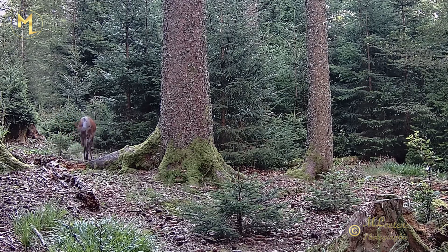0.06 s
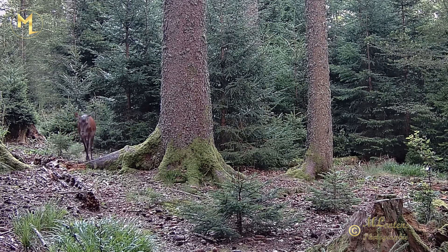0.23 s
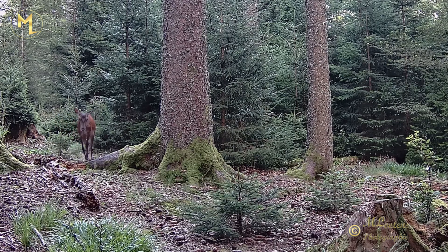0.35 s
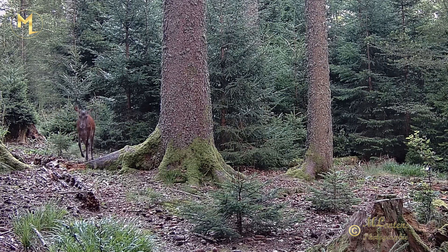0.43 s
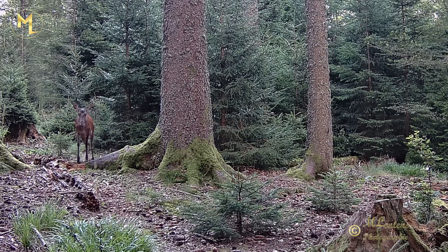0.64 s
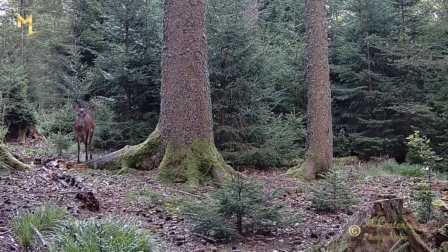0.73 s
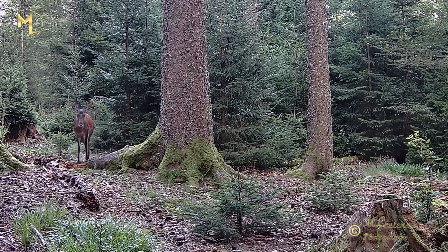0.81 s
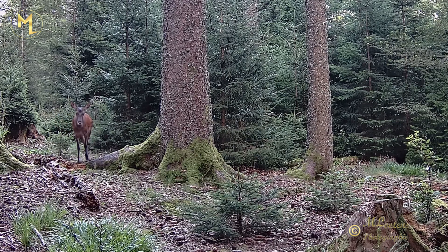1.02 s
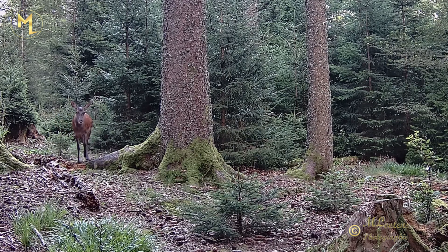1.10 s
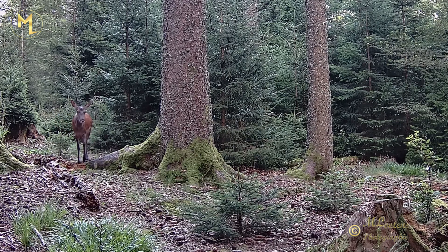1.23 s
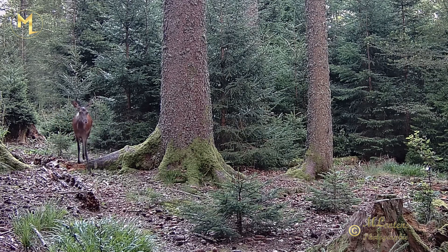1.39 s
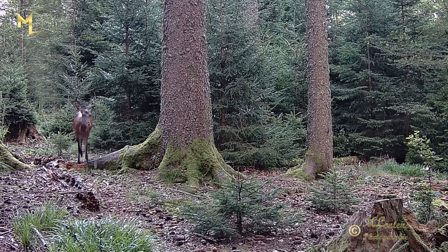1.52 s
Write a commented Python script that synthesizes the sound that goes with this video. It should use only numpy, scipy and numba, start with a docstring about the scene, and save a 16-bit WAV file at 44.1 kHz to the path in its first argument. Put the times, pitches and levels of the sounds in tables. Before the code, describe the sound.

A deer gives one short, harsh grunt amid soft hoof thuds and snapping twigs.

```python
"""A low forest rumble and hiss, soft hoof thuds and snapping twigs, then a deer's short, harsh grunt.
Its vocal folds snap shut ever more slowly, ringing the throat over a deep fundamental, and the call
ends in a puff of air; the trees return a faint tail. The rumble and hiss sink for a moment
after the call, then come back under a few more steps and snaps."""
import sys
import numpy as np
from scipy import signal
from scipy.fft import rfft, irfft
from scipy.io import wavfile
from scipy.ndimage import uniform_filter1d
from numba import njit

SR = 44100
rng = np.random.default_rng(int(sys.argv[2]) if len(sys.argv) > 2 else 0)


def master_out(mix):
    """Clip the mix to full scale and print it as 16-bit PCM to the path in sys.argv[1]."""
    frames = np.transpose(np.atleast_2d(mix))
    ceiling = np.clip(frames, -1, 1)
    pcm = np.round(ceiling * 32767).astype(np.int16)
    wavfile.write(sys.argv[1], SR, pcm)


N = 68355
GLIDE_S = (.45, .52)  # the throat lengthens over this time


def undb(db):
    """Decibels to gain."""
    return 10 ** (np.asarray(db) / 20)


def curve(rows, t, column=1):
    """Join a table's rows by straight lines."""
    rows = np.array(rows)
    return np.interp(t, rows[:, 0], rows[:, column])


def unit(x):
    """Scale to rms 1."""
    return x / np.std(x)


def colour(x, points):
    """Minimum-phase EQ through (freq_hz, gain_db) points."""
    size = 2 * N
    hz, db = np.array(points).T
    bins_hz = np.maximum(np.arange(N + 1) * SR / size, 1)
    cepstrum = irfft(np.log(undb(np.interp(np.log(bins_hz), np.log(hz), db))))
    cepstrum[1:N] *= 2
    cepstrum[N + 1:] = 0
    return irfft(rfft(x, size) * np.exp(rfft(cepstrum)))[:N]


def noise(points):
    """Noise coloured by an EQ curve, rms 1."""
    return unit(colour(rng.standard_normal(N), points))


def ring(x, hz, width_hz):
    """One resonance, gain 1 at its centre."""
    return signal.lfilter(*signal.iirpeak(hz, hz / width_hz, fs=SR), x)


@njit
def resonate(x, hz, width_hz):
    """A resonance whose centre and damping move."""
    out, z = np.empty(len(x)), 0j
    for i in range(len(x)):
        z = z * np.exp((2j * hz[i] - width_hz[i]) * np.pi / SR) + x[i] + 1e-18
        out[i] = z.real * 2 * np.pi / SR
    return out


def lowpass(x, hz):
    """Low-pass without delay."""
    return signal.sosfiltfilt(signal.butter(4, hz, fs=SR, output="sos"), x, padtype="even")


def drift(rate_hz):
    """Random wander, spread 1."""
    hold = int(SR / rate_hz)
    steps = np.repeat(rng.standard_normal(N // hold + 1), hold)
    return unit(uniform_filter1d(steps, hold)[:N])


def gate(t, start_s, end_s, fade_samples):
    """On between two times, with soft edges."""
    return uniform_filter1d(1. * ((t > start_s) & (t < end_s)), fade_samples)


def clicks(times, sizes):
    """Single sharp pushes at the given times."""
    out = np.zeros(N)
    for at_s, size in zip(times, sizes):
        i = int(at_s * SR) + np.arange(-8, 9)
        out[i] += size * np.sinc(i - at_s * SR) * np.hanning(len(i))
    return out


def knock(t, peak_s, level_db, pitch_hz, width_s):
    """A dull knock: a low tone under a brief bell-shaped envelope."""
    age = t - peak_s
    return undb(level_db) * np.exp(-(age / width_s) ** 2) * np.cos(2 * np.pi * pitch_hz * age)


def background(t):
    """Fluttering rumble, smooth hiss and a faint far drone; all sink after the call."""
    # tone of the forest air: freq_hz, gain_db
    forest_eq = [(15, -41.5), (25, 1), (43, -5), (87, 0.5), (133, -9), (186, -7.5), (273, -14.5), (364, -9),
                 (474, -15.5), (522, -14.5), (662, -19), (1040, -18), (1940, -23), (4710, -26.5),
                 (7600, -33), (9880, -91.5), (16700, -120)]
    # level ride: time_s, bass_db, treble_db
    ride = [(0, 4, 2), (.3, 6.5, 4.5), (.53, 11, 6), (.60, -1, -6.5), (.70, -7.5, -9), (.925, -12, -9.5),
            (.95, -2, -2.5), (1.1, 1.5, -0.5), (1.55, -1.5, -0.5)]
    bed = undb(-42) * noise(forest_eq)
    rumble = lowpass(bed, 200)
    hiss = bed - rumble
    drone_hz, width_hz = 364, 64
    drone = undb(-57.5) * unit(ring(ring(rng.standard_normal(N), drone_hz, width_hz), drone_hz, width_hz))
    flutter_db = drift(rate_hz=18)
    return rumble * undb(curve(ride, t) + flutter_db) + (hiss + drone) * undb(curve(ride, t, column=2))


def woods(x, t):
    """The direct sound plus faint scatter from trunks and branches."""
    t60_s, predelay_s, wet_db = .36, .02, -22
    tail = rng.standard_normal(N) * np.exp(-np.log(1000) * t / t60_s) * (t > predelay_s)
    return x + undb(wet_db) * signal.fftconvolve(x, tail / np.linalg.norm(tail))[:N]


def hooves(t):
    """Hooves thud dully into soft ground."""
    # steps on the leaf litter: peak_s, level_db, pitch_hz, width_s
    thuds = [(0.078, -33, 45.3, 0.0092), (.178, -27, 57.6, .018), (1.123, -34, 86.5, 0.014),
             (1.305, -36, 200, 0.0058), (1.475, -37, 85.4, 0.022)]
    return sum(knock(t, *thud) for thud in thuds)


def twigs(t):
    """Each twig cracks, rings briefly at two pitches and splinters."""
    # breaking twigs: start_s, level_db, low_hz, low_db, high_hz, high_db, splinter_db, splinter_decay_s
    snaps = [(.2182, -24.5, 2436, 6.5, 5320, 6.5, -22.5, 0.012),
             (0.227, -33.5, 2500, 18, 3410, 10, -10.5, 0.0089),
             (0.3683, -39, 5400, -7.5, 6550, 12, -8, 0.0094), (1.029, -47.5, 1800, 9, 5500, 9, -11, 0.0054),
             (1.1688, -33.5, 4070, 12, 5560, 16, -38, 0.0022),
             (1.2212, -44.5, 1540, 18, 4270, -2, -15, 0.0046)]
    # tone of dry wood cracking: freq_hz, gain_db
    wood_eq = [(300, -27), (1000, -20.5), (1500, -2.5), (2000, -11.5), (2500, -5), (3600, -1), (4600, -4),
               (5400, -9.5), (6000, -16.5), (7500, -27.5)]
    ring_q, span_s = 9, .01  # a snap's level is its rms as if packed into this span
    out = np.zeros(N)
    for start_s, level_db, low_hz, low_db, high_hz, high_db, splinter_db, splinter_decay_s in snaps:
        age = np.maximum(t - start_s, 0)
        crack_decay_s = min(.0013, splinter_decay_s / 4.4)
        crack = undb(-7) * np.exp(-age / crack_decay_s)
        splinter = undb(splinter_db + 2 * drift(rate_hz=980)) * np.exp(-age / splinter_decay_s)
        tearing = rng.standard_normal(N) * (crack + splinter) * (t >= start_s)
        snap = colour(clicks([start_s], [1]) + tearing, wood_eq)
        snap = (snap + undb(low_db) * ring(snap, low_hz, low_hz / ring_q)
                + undb(high_db) * ring(snap, high_hz, high_hz / ring_q))
        out += undb(level_db) * snap / np.sqrt(np.sum(snap ** 2) / (span_s * SR))
    return out


def vocal_folds(t):
    """The folds snap shut ever more slowly; gives the closures, phase in cycles and effort envelope."""
    # falling pitch of the grunt: time_s, pitch_hz
    pitch = [(.313, 133), (.36, 129), (.395, 125.3), (.427, 118.8), (.445, 111.5), (.465, 108), (.50, 96.8),
             (.515, 91), (.56, 91)]
    # force of the closures: time_s, level_db
    force = [(.313, -10.5), (.335, -20), (.352, -8), (.385, -5), (.432, -1), (.48, -1), (.505, -3.5),
             (.52, 0.5)]
    start_s, end_s = .3133, .524  # the folds touch only between these times
    uneven_db, uneven_lag_s, shimmer_db, jitter_s = 2, .0008, .4, .00005
    phase = np.cumsum(curve(pitch, t)) / SR
    phase -= np.interp(start_s, t, phase)
    cycle = np.arange(int(np.interp(end_s, t, phase)) + 1)
    shut_s = np.interp(cycle, phase, t)
    shimmer, jitter = rng.standard_normal((len(cycle), 2)).T
    uneven = (shut_s < .40) * (cycle > 1) * (-1) ** cycle  # early on, every second one is weak and late
    sizes = undb(curve(force, shut_s) - uneven_db * uneven + shimmer_db * shimmer)
    closures = clicks(shut_s + uneven_lag_s * uneven / 2 + jitter_s * jitter, sizes)
    effort = undb(curve(force, t)) * gate(t, start_s, end_s, fade_samples=200)
    return closures, phase, effort


def puff(t):
    """Air let go at the end of the call."""
    # tone of the breath: freq_hz, gain_db
    puff_eq = [(200, -14.5), (700, -6), (1400, -2), (2500, 3), (3000, -9), (3500, 1), (4800, -13),
               (5600, -34), (7500, -43)]
    peak_s, width_s = .529, .011
    return undb(-32) * np.exp(-((t - peak_s) / width_s) ** 2) * noise(puff_eq)


def wheeze(effort, t):
    """Air hisses through the open mouth."""
    # tone of that hiss: freq_hz, gain_db
    wheeze_eq = [(2000, -33), (3100, -12), (3500, -3), (3950, -5.5), (4400, -0.5), (5050, -2.5),
                 (5350, -24), (7500, -44.5)]
    return undb(-38) * effort * (t > .377) * noise(wheeze_eq)


def rasp(effort, phase, t):
    """Steady air in the voice and, late in the call, a burst of it just ahead of each closure."""
    lead_cycles, width_cycles, burst_db, steady_db = .17, .09, -14.5, -40
    offset = (phase + lead_cycles + .5) % 1 - .5
    bursts = np.exp(-(offset / width_cycles) ** 2) * np.interp(t, GLIDE_S, [0, 1])
    return effort * (undb(burst_db) * bursts + undb(steady_db)) * rng.standard_normal(N)


def throat(source, phase, t):
    """Fixed throat colour, plus sharp resonances that sink as the call ends; open folds damp them."""
    # formants of throat and mouth: freq_hz, gain_db
    throat_eq = [(150, -34), (300, -31.5), (430, -16.5), (680, -26), (1000, -14.5), (1330, -4.5), (1500, 1),
                 (1830, -3), (2100, -3.5), (2420, -1), (2700, -8), (3000, -27), (3500, -12.5), (3900, -16),
                 (4250, -12.5), (5050, -19.5), (5350, -49), (7500, -60)]
    # resonances that ring while the folds are shut: early_hz, late_hz, width_hz, early_db, late_db
    rings = [(2130, 2090, 93, 8.5, 0.5), (1300, 490, 100, -6, 14), (490, 480, 45, 9, 4)]
    body = colour(source, throat_eq)
    glide = np.interp(t, GLIDE_S, [0, 1])
    folds_open = (phase % 1 > .54) * (phase % 1 < .95)
    voice = body
    for early_hz, late_hz, width_hz, early_db, late_db in rings:
        centre_hz = early_hz + (late_hz - early_hz) * glide
        damping_hz = 1400 * folds_open * early_hz / rings[0][0]  # higher rings are damped harder
        ringing = width_hz * resonate(body, centre_hz, width_hz + damping_hz)
        gain = undb(early_db + (late_db - early_db) * glide)
        voice = voice + gain * ring(ringing, (early_hz + late_hz) / 2, (early_hz + late_hz) / 3)
    return voice


def mouth(voice, t):
    """The sound widens from a nasal band as the mouth opens."""
    opening_s, shut_db = (.345, .39), -15
    nasal = lowpass(voice, hz=2950) - lowpass(voice, hz=1320)
    return nasal + (voice - nasal) * undb(np.interp(t, opening_s, [shut_db, 0]))


def chest(phase, t):
    """The smooth flow between closures gives the deep fundamental and a faint octave."""
    # weight of the fundamental: time_s, level_db
    weight = [(.312, -57), (.326, -18.5), (.385, -22), (.443, -17.5), (.465, -24.5), (.512, -25),
              (.527, -51.5), (.541, -21), (.565, -47.5)]
    lag_cycles, octave_db = .059, -30.5
    angle = 2 * np.pi * (phase - lag_cycles)
    envelope = gate(t, weight[0][0], weight[-1][0], fade_samples=300) * undb(curve(weight, t))
    return envelope * (np.cos(angle) + undb(octave_db) * np.cos(2 * angle))


def deer(t):
    """Closures and rasping air ring the throat; gives the grunt and, apart, its fundamental."""
    closures, phase, effort = vocal_folds(t)
    breath = puff(t)
    source = rasp(effort, phase, t) - 2 * closures
    voice = mouth(undb(12.5) * throat(source, phase, t), t)
    throat_closing = knock(t, peak_s=.5178, level_db=-25, pitch_hz=405, width_s=.0031)
    return voice + wheeze(effort, t) + breath + throat_closing, chest(phase, t)


def scene():
    """Grunt and twigs echo among the trees; fundamental, hooves and background stay dry."""
    t = np.arange(N) / SR
    grunt, fundamental = deer(t)
    return (woods(grunt + twigs(t), t) + fundamental + hooves(t) + background(t))[None]


def record(dry):
    """Master EQ: drop the deepest rumble and cut the top steeply."""
    low_cut_hz, high_cut_hz = 22, 7650
    low_cut = signal.butter(2, low_cut_hz, "high", fs=SR, output="sos")
    high_cut = signal.ellip(10, .1, 50, high_cut_hz, fs=SR, output="sos")
    trimmed = signal.sosfiltfilt(low_cut, dry, padtype="even")
    return signal.sosfiltfilt(high_cut, trimmed, padtype="even")


dry = scene()
out = record(dry)
master_out(out)
```